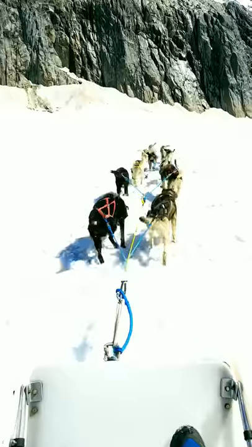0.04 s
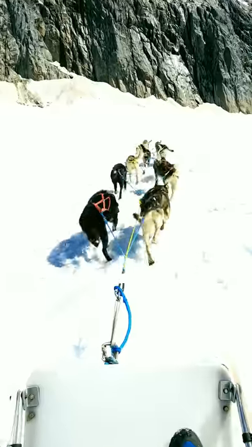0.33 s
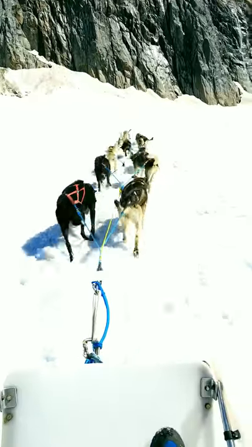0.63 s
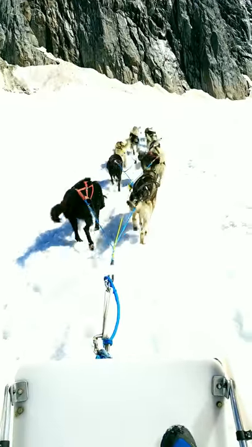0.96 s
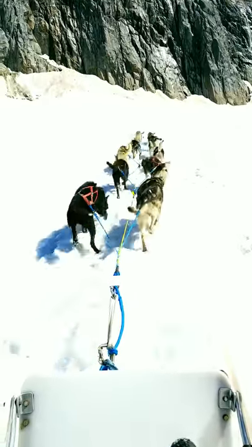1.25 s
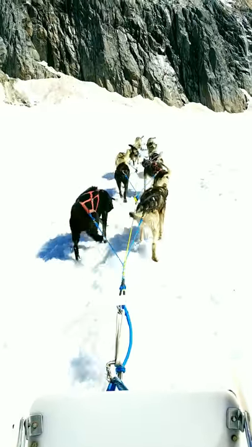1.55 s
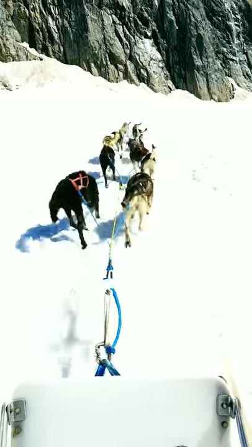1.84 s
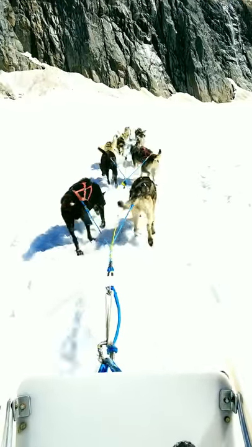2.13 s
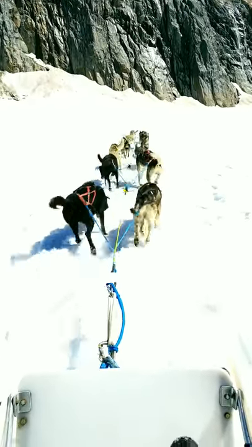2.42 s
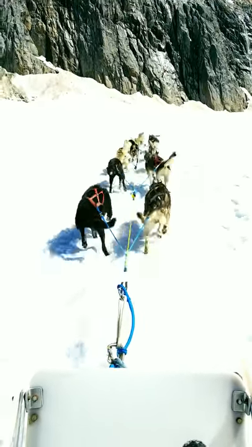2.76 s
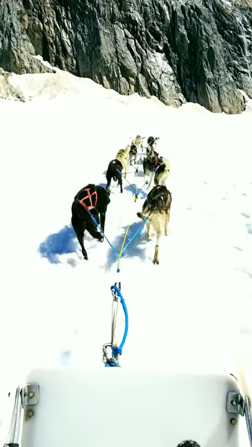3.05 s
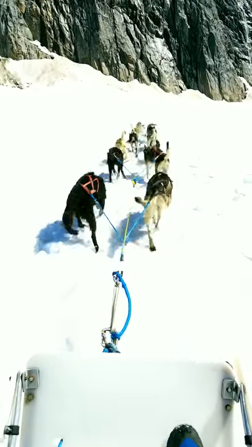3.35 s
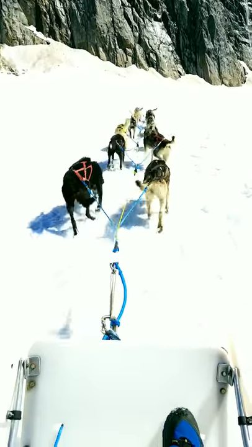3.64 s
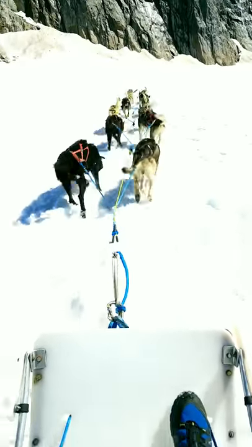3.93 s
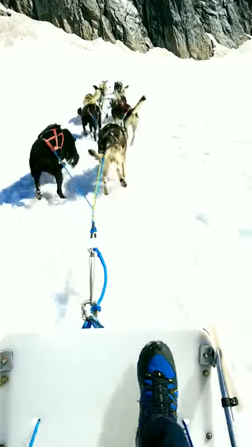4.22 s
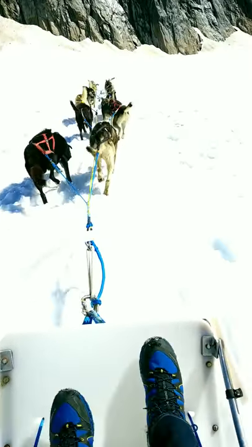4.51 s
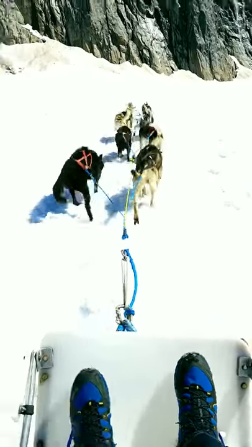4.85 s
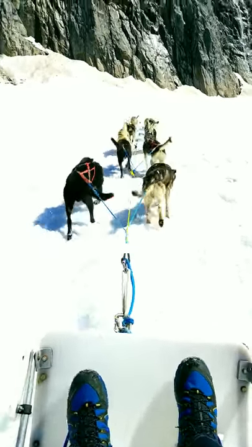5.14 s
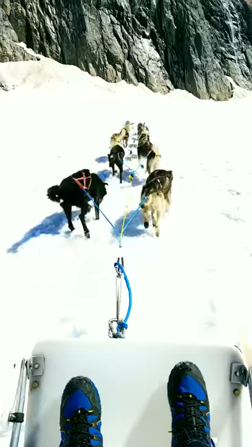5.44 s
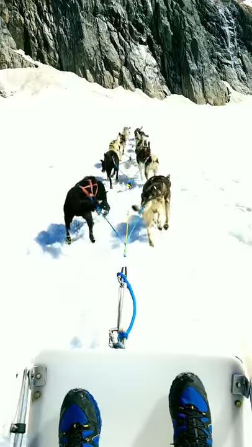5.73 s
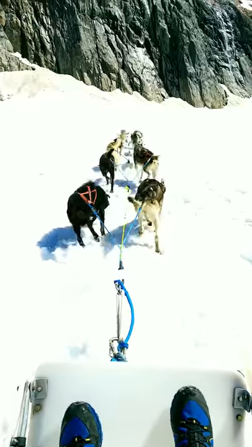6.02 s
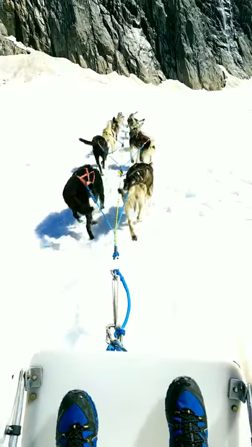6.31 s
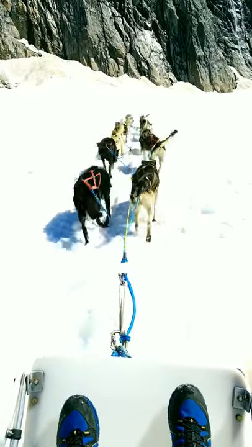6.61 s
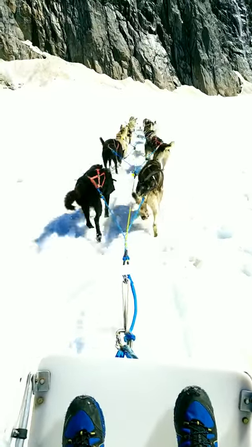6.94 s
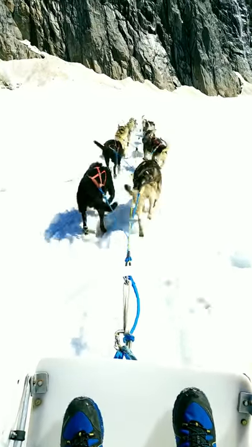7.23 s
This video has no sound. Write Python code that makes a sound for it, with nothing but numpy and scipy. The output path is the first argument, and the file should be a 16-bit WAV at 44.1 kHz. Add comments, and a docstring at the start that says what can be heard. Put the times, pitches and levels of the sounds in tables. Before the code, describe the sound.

Outdoors, from the seat of a moving sled, wind gusts first thump on the microphone over a continuous hollow rumble and the grainy hiss of runners on snow. The ride swells twice into rougher stretches with clusters of dull knocks, the second with brief scrapes and a short squeak. Clods of snow click against the bow throughout. After a quieter glide, the rumble and gusts return.

```python
"""Dog sled on summer snow.

Heard from the seat: ruts shake the plastic shell into a hollow rumble that surges as the sled rocks
over humps. The runners hiss, crush and scrape through coarse crystals, bumps knock the shell and
kicked-up clods clack on the bow. The sled gives a few short squeaks; gusts buffet the microphone."""
import sys
import numpy as np
from scipy import signal
from scipy.fft import rfft, irfft
from scipy.io import wavfile
from scipy.ndimage import uniform_filter1d, map_coordinates

SR = 44100
rng = np.random.default_rng(int(sys.argv[2]) if len(sys.argv) > 2 else 0)


def to_wav(sig):
    """Store sig (one row per channel, or 1-D mono) as 16-bit WAV at the path in sys.argv[1].

    Samples outside -1..1 are clipped; the rate is SR.
    """
    pcm = np.clip(np.atleast_2d(sig), -1, 1) * 32767
    pcm = np.round(pcm).astype(np.int16)
    wavfile.write(sys.argv[1], SR, pcm.T)  # frames by channels


N = 325017
TIME_S = np.arange(N) / SR
BIN_HZ = np.maximum(np.arange(N // 2 + 1) * SR / N, 1)
PORT_LAG_S, SHELL_LAG_S = 0.00038, 0.00028   # left microphone port lags; less for the low-lying shell

# Shell resonances. Each row: pitch in Hz, width per filter stage in Hz, relative level in dB,
# sensitivity to load from 0 to 1.
SHELL_MODES = [(180, 93, -8, 0.3), (246, 91, -3.5, 1), (314.4, 90, -0.5, 0.81), (365, 83, -4, 0.8),
               (446, 450, -16, 0.58), (682, 244, -13, 0.63)]
# Boost of the lowest resonances. Each row: time in seconds, gain in dB.
BOOM_CURVE = [(0.3, 3), (1.4, 4.5), (1.7, -1.5), (2.7, -1.5), (3.3, 3.5), (4.1, -2.5), (5.0, -1), (7.0, -1)]

def shell_rumble(drag_db):
    """Ruts jolt the shell in clumps; under heavy load its hollow main resonances take over."""
    shake_db = 1.2 * np.minimum(drag_db, 5.5)   # above the cap the runners plough and shake no harder
    level_db = -33.5 + shake_db + rocking() + 1.78 * drift(7.1)   # uneven snow wavers the load
    load_db = level_db - np.mean(level_db)
    jolts = grains(per_s=2500, spread_db=0.5) * from_db(1.03 * drift(22))
    boom_db = over_time(BOOM_CURVE)
    modes = 0
    for hz, width_hz, mode_db, sensitivity in SHELL_MODES:
        push = np.roll(jolts, rng.integers(N), axis=1)   # each mode is driven at another spot
        gain = from_db(mode_db + (sensitivity + 0.5) * load_db + boom_db * (hz < 280))
        modes = modes + gain * unit_rms(resonate(push, hz, width_hz))
    rumble = at_ports(modes[0], SHELL_LAG_S) + from_db(-14.5) * modes[1:]
    running_rms = np.sqrt(uniform_filter1d(np.mean(rumble ** 2, axis=0), size=SR // 18) + 1e-12)
    return from_db(level_db) * rumble / running_rms


# Humps. Each row: first landing in seconds, swing in dB, period in seconds, decay in seconds.
HUMP_LANDINGS = [(1.736, 2, 0.27, 0.93), (4.385, 0.6, 0.413, 1.0), (6.55, 3.5, 0.57, 0.4)]

def rocking():
    """Rumble swing in dB: after a hump the sled pitches, pressing on the snow at each landing."""
    swing_db = np.zeros(N)
    bias = 0.94   # a landing adds more load than the rebound takes away
    for start_s, depth_db, period_s, decay_s in HUMP_LANDINGS:
        age = TIME_S - start_s
        envelope = np.clip(1 + 2 * age / period_s, 0, 1) * np.exp(-np.maximum(age, 0) / decay_s)
        swing_db += depth_db * envelope * (bias + np.cos(2 * np.pi * age / period_s))
    return swing_db


# Bumps. Each row: start in seconds, swing peak in dB, pitch in Hz, 60 dB decay time in seconds.
BUMPS = [(0.286, -16.5, 117, 0.023), (0.846, -21, 290, 0.025), (1.211, -12, 129, 0.033),
         (1.213, -20.5, 260, 0.036), (1.694, -38, 320, 0.035), (1.738, -10, 316, 0.082),
         (1.808, -14, 296, 0.079), (1.955, -17, 322, 0.033), (1.979, -10.5, 335, 0.048),
         (2.009, -15.5, 320, 0.029), (2.222, -21.5, 334, 0.036), (2.246, -15, 289, 0.036),
         (2.434, -32, 100, 0.031), (2.542, -18, 322, 0.096), (2.768, -23, 162, 0.018),
         (2.899, -22, 296, 0.028), (2.933, -29, 286, 0.025), (3.090, -20, 186, 0.021),
         (3.148, -24, 320, 0.055), (3.531, -28.5, 124, 0.023), (3.762, -25, 300, 0.015),
         (4.342, -14.5, 316, 0.035), (4.399, -13.5, 290, 0.03), (4.512, -22.5, 330, 0.028),
         (4.598, -15, 299, 0.034), (4.616, -12.5, 313, 0.016), (4.626, -13.5, 476, 0.012),
         (4.670, -23, 574, 0.021), (4.813, -15, 382, 0.05), (4.849, -14, 350, 0.031),
         (4.909, -13, 323, 0.026), (5.076, -19.5, 305, 0.065), (5.825, -24.5, 270, 0.015),
         (5.917, -31.5, 347, 0.027), (5.988, -27, 229, 0.048), (5.992, -33, 440, 0.014),
         (6.132, -22.5, 236, 0.041), (6.535, -21, 333, 0.066), (6.560, -19, 250, 0.032),
         (6.665, -20.5, 314, 0.077), (7.195, -20, 323, 0.04)]

def knocks(rise_s=0.005, ring_db=11, falloff_db_per_oct=9):
    """A bump cushioned by snow swings the shell for a few cycles and rings its nearest resonances."""
    swings, blows = np.zeros(N), np.zeros((len(SHELL_MODES), N))
    mode_hz = np.transpose(SHELL_MODES)[0]
    for start_s, peak_db, hz, t60_s in BUMPS:
        at = int(start_s * SR)
        age = TIME_S[:min(SR // 5, N - at)]
        envelope = (1 - np.exp(-age / rise_s)) * from_db(-60 * age / t60_s)
        swing = -np.sin(2 * np.pi * hz * age) * envelope
        swings[at:at + len(age)] += from_db(peak_db) * swing / np.abs(swing).max()
        octaves = np.abs(np.log2(mode_hz / hz))
        blows[:, at + int(rise_s * SR)] += from_db(peak_db + ring_db - falloff_db_per_oct * octaves)
    ring = sum(from_db(mode_db) * resonate(blow, hz, width_hz)
               for blow, (hz, width_hz, mode_db, _) in zip(blows, SHELL_MODES))
    return at_ports(swings + ring, SHELL_LAG_S)


# Snow under the runners. Each row: frequency in Hz, relative level in dB.
HISS_SPECTRUM = [(500, -18), (1500, -1), (2600, -1.5), (4200, 2), (4900, -2), (5800, 0.5), (7400, 1),
                 (7900, -8.5), (8500, -10), (10000, -7.5), (13000, -4.5), (15700, -3)]
CRUSH_SPECTRUM = [(300, -6.5), (560, 8.5), (720, 3.5), (1000, 1.5), (1400, 4), (1700, 1), (2000, -5),
                  (2400, -7.5), (3200, -18), (6000, -12.5), (16000, -47)]
CRUNCH_SPECTRUM = [(2000, -10), (4000, -9), (5200, 3), (7200, 0), (8200, -20), (16000, -8.5)]

def runners(drag_db):
    """Crystals brush along the runners, crush under the weight and snap under hard drag."""
    hiss = snow_noise(HISS_SPECTRUM, per_s=30000, spread_db=1.5)
    hiss *= from_db(-40.5 + 1.09 * drag_db + 1.11 * drift(23))
    treble = irfft(rfft(hiss) * (BIN_HZ > 9100), N)
    hiss += treble * (from_db(0.7 - 0.31 * drag_db) - 1)   # light gliding sounds finer
    crush = snow_noise(CRUSH_SPECTRUM, per_s=4000, spread_db=1)
    crush *= from_db(-41 + 0.55 * drag_db + 0.66 * drift(34))
    hiss = snow_patches(hiss, depth_db=3, patch_hz=248.7, patch_s=0.04)
    crush = snow_patches(crush, depth_db=4, patch_hz=177.4, patch_s=0.035)
    crunch = snow_noise(CRUNCH_SPECTRUM, per_s=1500, spread_db=-3)
    crunch *= from_db(-54 + 2.09 * drag_db + 0.77 * drift(25))
    return hiss + crush + crunch


def snow_patches(x, depth_db, patch_hz, patch_s):
    """The snow in contact keeps changing, and with it the pitches that stand out."""
    hz, times_s, frames = signal.stft(x, SR, nperseg=512)
    patches = rng.standard_normal((400, 600))
    grid = np.meshgrid(hz / patch_hz, times_s / patch_s, indexing="ij")
    gain_db = depth_db * map_coordinates(patches, grid, order=1, mode="mirror")
    return signal.istft(frames * from_db(gain_db), SR, nperseg=512)[1][:, :N]


# Clods on the bow, levels relative. Each row: start in seconds, crumble in dB, crack in dB,
# woody body in dB, body pitch in Hz, bright ping in dB, ping pitch in Hz.
CLOD_HITS = [(0.258, -39, -19, -34, 1300, -28.5, 2860), (0.846, -30.5, -25, -25, 1050, -34, 3950),
             (1.352, -30.5, -21, -31, 1340, -27, 2900), (1.489, -30, -25, -42, 1340, -30, 2850),
             (1.762, -28, -21, -19, 1280, -21, 2790), (2.096, -33, -29, -38, 1700, -41, 2400),
             (2.149, -39, -22, -21, 1020, -24.5, 2860), (2.193, -36, -27, -40, 1340, -32, 2850),
             (2.415, -40, -22, -36, 1700, -26, 2750), (2.831, -30.5, -30, -29, 1050, -40, 2400),
             (2.934, -30, -17, -22, 1000, -35, 2850), (3.137, -29, -26, -15.5, 1030, -24, 2390),
             (3.686, -38, -30, -30, 900, -39, 2850), (3.762, -33.5, -32, -22.5, 930, -31, 2950),
             (3.812, -36.5, -33, -38, 1340, -36, 2300), (3.838, -45, -33, -28, 1300, -42, 2400),
             (3.872, -37, -30, -39, 1340, -32, 2800), (3.923, -30, -21, -20, 1330, -36, 2950),
             (4.147, -30.5, -19, -21, 900, -34, 2900), (4.219, -36, -26, -25, 1000, -37, 2850),
             (4.374, -37, -22, -36, 1700, -34, 2400), (4.668, -26.5, -20, -17, 1300, -26, 1750),
             (4.877, -29.5, -26, -39, 1340, -22, 2870), (5.917, -33.5, -23, -34, 1020, -29, 2950),
             (5.930, -41, -27, -32, 1700, -38, 2400), (5.988, -33.5, -31, -18.5, 870, -35, 2410),
             (6.128, -31.5, -23, -16.5, 1180, -27, 2890), (6.691, -36.5, -29, -29, 1400, -37, 2400),
             (6.742, -33, -31, -28, 1750, -28, 2420)]
# Crumbling snow. Each row: frequency in Hz, relative level in dB.
CRUMBLE_SPECTRUM = [(200, 4), (700, -10), (1100, 8), (1900, -0.5), (3000, -3.5), (4300, 1), (5000, -14),
                    (6000, -8), (7400, -13), (8200, -23), (16000, -15)]

def clods(breakup_s=0.0049):
    """Each clod lands with a crack, rings the bow and crumbles in milliseconds."""
    start_s, crumble_db, crack_db, *_ = np.transpose(CLOD_HITS)
    breakups = zip(start_s, crumble_db, np.full(len(start_s), breakup_s))
    crumble = showers(breakups, CRUMBLE_SPECTRUM, per_s=6000, rise_s=0.00011, fall_s=0.0086)
    contacts = np.zeros(N)
    contacts[(start_s * SR).astype(int)] = from_db(crack_db)
    crack_band = signal.butter(4, [250, 5400], "band", fs=SR, output="sos")
    crack = signal.sosfilt(crack_band, contacts + 1e-18)
    impact = from_db(-2) * bow_ring() + from_db(13) * crack
    return from_db(1) * crumble + at_ports(impact, PORT_LAG_S)


# Bow resonances. Each row: pitch in Hz, width in Hz, relative level in dB.
BOW_MODES = [(613, 49, -0.5), (920, 90, -2), (1123, 140, -2), (1270, 85, -7), (1750, 63, 1), (2360, 69, -1),
             (2850, 124, -4), (3580, 150, 7), (4080, 160, -9)]

def bow_ring(rise_s=0.00041, spread_db=3.5):
    """A clod's cushioned blow rings the bow; its landing spot favours modes near two pitches."""
    out, age = np.zeros(N), TIME_S[:SR // 20]
    hz, width_hz, mode_db = np.transpose(BOW_MODES)
    envelopes = np.exp(-np.pi * np.outer(width_hz, age)) * (1 - np.exp(-age / rise_s))
    for start_s, _, _, body_db, body_hz, ping_db, ping_hz in CLOD_HITS:
        near_body_db = body_db - 14.5 * np.abs(np.log2(hz / body_hz))
        near_ping_db = ping_db - 26 * np.abs(np.log2(hz / ping_hz))
        spot_db = np.maximum(near_body_db, near_ping_db) + spread_db * rng.standard_normal(len(hz))
        swings = np.sin(2 * np.pi * (np.outer(hz, age) + rng.random((len(hz), 1))))
        at = int(start_s * SR)
        out[at:at + len(age)] += from_db(spot_db + mode_db) @ (swings * envelopes)
    return out


# Scrapes and rasps. Each row: start in seconds, relative level in dB, hold in seconds.
CRUST_SCRAPES = [(4.626, -22.5, 0.008), (5.132, -24, 0.033)]
FIRM_SNOW_RASPS = [(0.35, -38.5, 0.069), (0.6, -44, 0.099), (0.82, -40, 0.11), (2.62, -43, 0.027),
                   (3.38, -44, 0.0078), (5.36, -45, 0.023), (6.78, -42.5, 0.08), (6.96, -42, 0.05)]
# Their spectra. Each row: frequency in Hz, relative level in dB.
SCRAPE_SPECTRUM = [(300, -16), (700, 13.5), (1130, -6), (1270, 19), (1450, -8), (2900, 2), (5000, 0),
                   (6400, 7), (7300, -7), (8200, -28), (16000, -26)]
RASP_SPECTRUM = [(600, -7), (1150, -17), (1370, 1.5), (1540, -9), (1800, -14), (5000, -38)]

def scraping():
    """The runners scrape sharply over hard crust and rasp more softly on firm snow."""
    scrapes = showers(CRUST_SCRAPES, SCRAPE_SPECTRUM, per_s=2400, rise_s=0.001, fall_s=0.01)
    rasps = showers(FIRM_SNOW_RASPS, RASP_SPECTRUM, per_s=1400, rise_s=0.0057, fall_s=0.059)
    return from_db(-4.5) * scrapes + from_db(3) * rasps


# Ice spray. Each row: start in seconds, relative level in dB, hold in seconds.
SPRAY_BURSTS = [(1.22, -42, 0.006), (1.252, -40, 0.006), (3.088, -41.5, 0.012), (3.223, -39, 0.0044),
                (3.487, -35, 0.0041), (3.569, -39.5, 0.005), (4.007, -41, 0.005), (5.594, -41, 0.02),
                (5.615, -47, 0.077), (6.428, -40, 0.0092)]
# Its spectrum. Each row: frequency in Hz, relative level in dB.
SPRAY_SPECTRUM = [(2000, -32), (6500, 5.5), (8500, -4), (11500, 2), (15500, 7)]

def ice_spray():
    """Fine ice grains scatter in brief, bright showers."""
    return from_db(4) * showers(SPRAY_BURSTS, SPRAY_SPECTRUM, per_s=2700, rise_s=0.0015, fall_s=0.0066)


# Squeaks. Each row: start in seconds, level in dB, length in seconds, first and last pitch in Hz.
SQUEAK_GLIDES = [(2.084, -42, 0.041, 2134, 2070), (4.621, -29.5, 0.016, 3380, 1950),
                 (5.827, -29, 0.0158, 470, 720), (5.846, -44, 0.014, 880, 1180)]

def squeaks(waver=0.06, rough_db=6, octave_db=-18):
    """Something on the sled sticks and slips: a rough, gliding chirp with a weak octave."""
    out, wander, flutter = np.zeros(N), drift(290), drift(220)
    for start_s, level_db, length_s, first_hz, last_hz in SQUEAK_GLIDES:
        span = slice(int(start_s * SR), int((start_s + length_s) * SR))
        progress = np.linspace(0, 1, span.stop - span.start)
        hz = first_hz * (last_hz / first_hz) ** progress * (1 + waver * wander[span])
        phase = 2 * np.pi * np.cumsum(hz) / SR
        swell = np.sqrt(np.abs(np.sin(np.pi * progress))) * from_db(level_db + rough_db * flutter[span])
        out[span] += swell * (np.sin(phase) + from_db(octave_db) * np.sin(2 * phase))
    return at_ports(out, PORT_LAG_S)


# Gusts. Each row: crest in seconds, level in dB, rise in seconds, fall in seconds.
WIND_GUSTS = [(0.31, -32, 0.22, 0.27), (0.82, -29.5, 0.16, 0.23), (1.13, -27.5, 0.3, 0.38),
              (1.5, -37.5, 0.16, 0.16), (6.6, -37, 0.13, 0.34), (6.95, -30, 0.22, 0.29)]
# Eddies. Each row: frequency in Hz, relative level in dB.
WIND_SPECTRUM = [(15, -10), (28, -10), (48, -4.5), (80, 1), (130, -1.5), (210, -4.5), (300, -20.5),
                 (600, -36), (3000, -55)]

def wind(drag_db):
    """Eddies press on each microphone port separately; strong gusts hit the right one harder."""
    power = from_db(-52 + 0.74 * drag_db) ** 2   # headwind grows with the pull of the sled
    for crest_s, gust_db, rise_s, fall_s in WIND_GUSTS:
        from_crest = np.maximum((crest_s - TIME_S) / rise_s, (TIME_S - crest_s) / fall_s)
        power += (from_db(gust_db) * np.exp(-from_crest ** 2)) ** 2
    level_db = 10 * np.log10(power)
    lean_db = 6 * from_db(level_db - np.max(level_db)) ** 0.5
    eddies = rng.standard_normal((2, N)) * from_db(1.5 * np.array([drift(12), drift(6.9)]))
    eddies = irfft(rfft(eddies) * from_db(over_hz(WIND_SPECTRUM)), N)
    running_rms = np.sqrt(uniform_filter1d(eddies ** 2, size=SR // 4) + 1e-12)
    return lean_right(from_db(level_db) * eddies / running_rms, lean_db)


# Snow noise arriving directly at both ports, the right slightly earlier.
# Each row: frequency in Hz, share of power from 0 to 1.
DIRECT_SHARE = [(200, 0.85), (700, 0.65), (1300, 0.62), (2500, 0.33), (5000, 0.1), (15000, 0.03)]

def snow_noise(spectrum, per_s, spread_db):
    """Coloured grains in stereo at unit power; the treble is the most scattered."""
    spectra = rfft(grains(per_s, spread_db)) * from_db(over_hz(spectrum))
    share = over_hz(DIRECT_SHARE)
    direct = irfft(spectra[0] * np.sqrt(share), N)
    scattered = irfft(spectra[1:] * np.sqrt(1 - share), N)
    return unit_rms(at_ports(direct, PORT_LAG_S) + scattered)


def showers(rows, spectrum, per_s, rise_s, fall_s):
    """Bursts of grains that rise, hold while the snow breaks up, then fall."""
    envelope = np.zeros(N)
    for start_s, level_db, hold_s in rows:
        at = int(start_s * SR)
        age = TIME_S[:min(SR // 5, N - at)]
        fall = np.exp(-np.maximum(age - hold_s, 0) / fall_s)
        envelope[at:at + len(age)] += from_db(level_db) * (1 - np.exp(-age / rise_s)) * fall
    return envelope * snow_noise(spectrum, per_s, spread_db=-2)


def grains(per_s, spread_db):
    """Three independent trains of random clicks: direct, scattered left, scattered right."""
    shape = (3, N)
    sizes = rng.standard_normal(shape) * from_db(spread_db * np.minimum(rng.exponential(1, shape), 4))
    return unit_rms(sizes * (rng.random(shape) < per_s / SR))


def resonate(x, hz, width_hz):
    """Two identical two-pole resonators in series, unit gain at the peak."""
    r = np.exp(-np.pi * width_hz / SR)
    b = np.array([1, 0, -1]) * (1 - r * r) / 2
    a = [1, -2 * r * np.cos(2 * np.pi * hz / SR), r * r]
    return signal.lfilter(b, a, signal.lfilter(b, a, x + 1e-18) + 1e-18)


def drift(corner_hz):
    """Smooth random wander with a spread of 1."""
    hop, settle = 40, 2000
    r = np.exp(-2 * np.pi * corner_hz * hop / SR)
    noise = rng.standard_normal(N // hop + settle + 2)
    slow = signal.lfilter([1], [1, -2 * r, r * r], noise)[settle:]
    return np.interp(np.arange(N) / hop, np.arange(len(slow)), unit_rms(slow))


def at_ports(x, lag_s):
    """Mono to stereo: sound reaches the left port after the right."""
    return np.array([irfft(rfft(x) * np.exp(-2j * np.pi * BIN_HZ * lag_s), N), x])


def lean_right(x, db):
    """Lower the left channel and raise the right."""
    return x * from_db(db * np.array([[-1], [1]]))


def over_time(points):
    """A curve's value at every sample."""
    return np.interp(TIME_S, *np.transpose(points))


def over_hz(points):
    """A curve's value at every frequency bin."""
    hz, value = np.transpose(points)
    return np.interp(np.log(BIN_HZ), np.log(hz), value)


def from_db(db):
    """Decibels to gain."""
    return 10 ** (np.asarray(db) / 20)


def unit_rms(x):
    """Scale to unit power."""
    return x / np.sqrt(np.mean(x ** 2) + 1e-20)


# Drag of the runners on the snow. Each row: time in seconds, relative drag in dB.
DRAG_CURVE = [(0.12, -49.5), (0.8, -42.5), (1.05, -47), (1.47, -51.5), (1.58, -42), (1.74, -40.5),
              (2.05, -42), (2.35, -45.5), (3.05, -45.5), (3.3, -51.5), (3.7, -52.5), (3.9, -47.5),
              (4.15, -43), (4.4, -40.5), (4.68, -38.5), (5.05, -43), (5.28, -48.5), (5.85, -53),
              (6.35, -48), (6.55, -44), (7.1, -44), (7.37, -46)]

def scene():
    """Sled, snow and wind; the drag about its mean drives all the steady layers."""
    drag_db = over_time(DRAG_CURVE)
    drag_db -= np.mean(drag_db)
    shell = shell_rumble(drag_db) + knocks()
    snow = runners(drag_db) + scraping() + ice_spray() + clods()
    return lean_right(shell + snow + squeaks(), db=0.38) + wind(drag_db)


def record(dry):
    """The microphone opens after a moment; the top treble is cut steeply."""
    open_s, cutoff_hz = 0.105, 15900
    gate = np.interp(TIME_S, [open_s - 0.002, open_s + 0.002], [0.002, 1])
    return irfft(rfft(dry * gate) / np.sqrt(1 + (BIN_HZ / cutoff_hz) ** 240), N)


dry = scene()
out = record(dry)
to_wav(out)
```